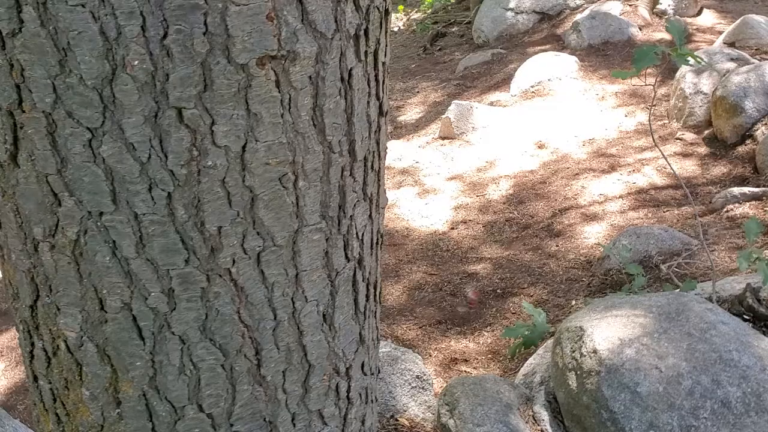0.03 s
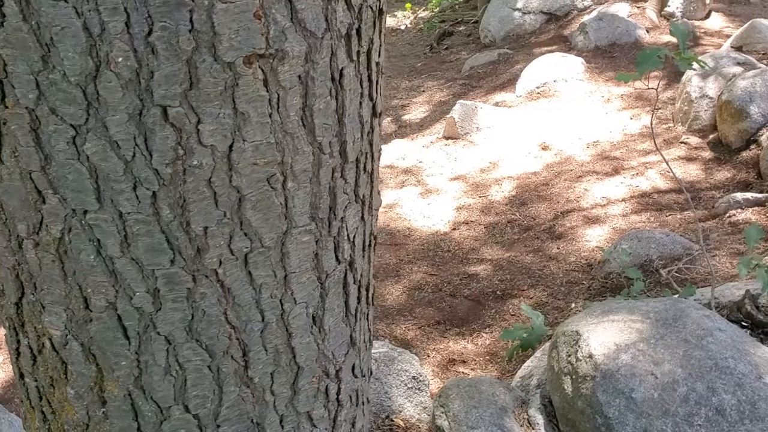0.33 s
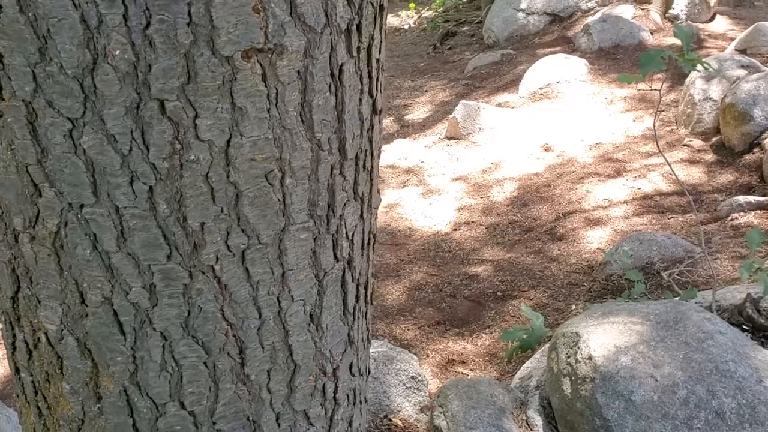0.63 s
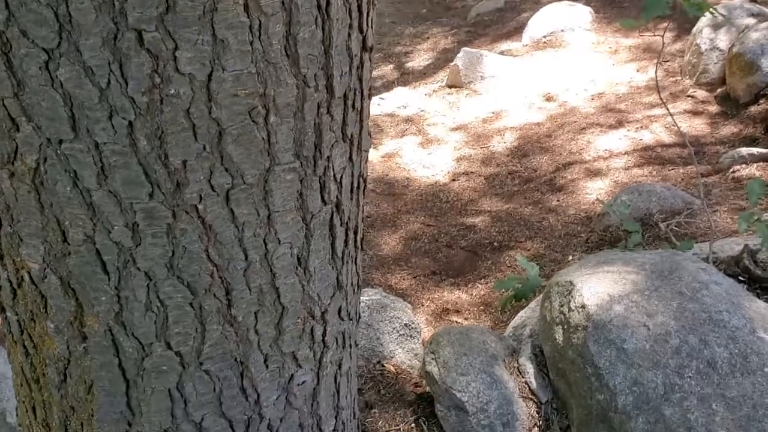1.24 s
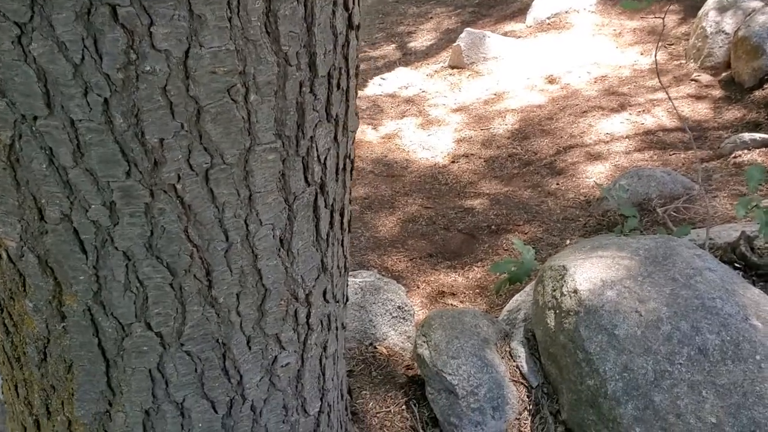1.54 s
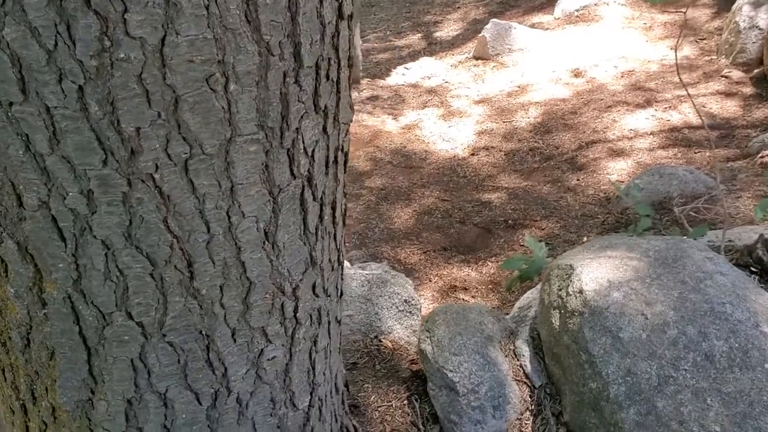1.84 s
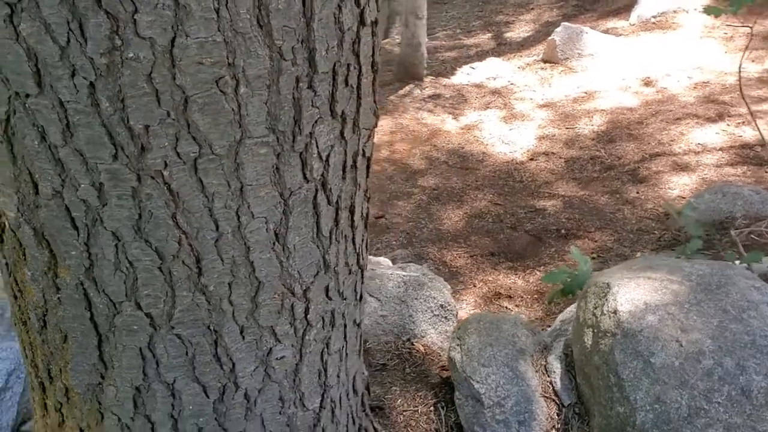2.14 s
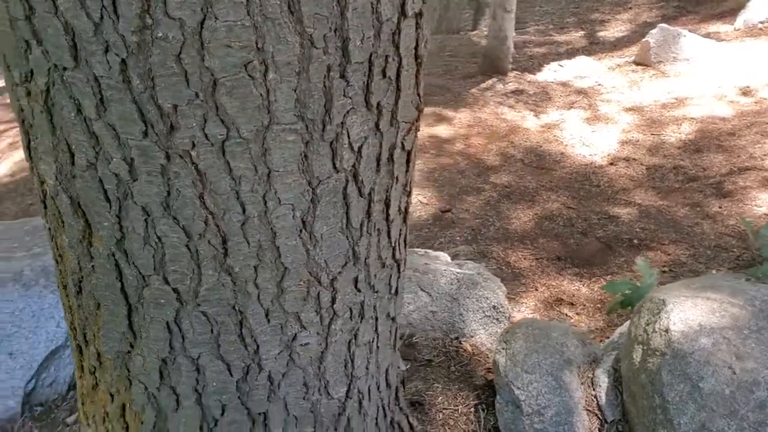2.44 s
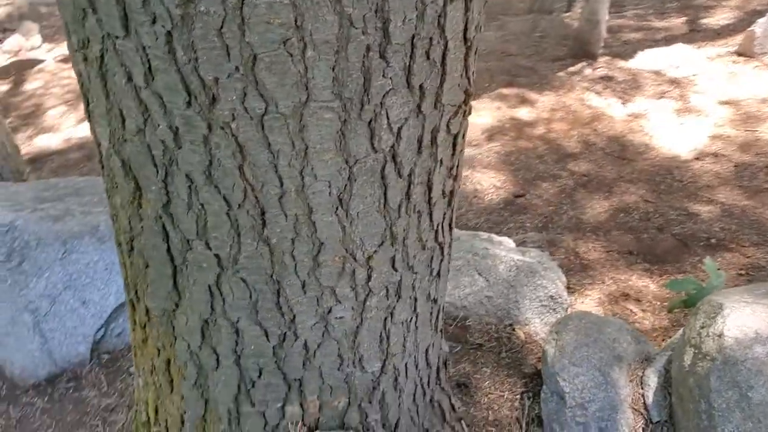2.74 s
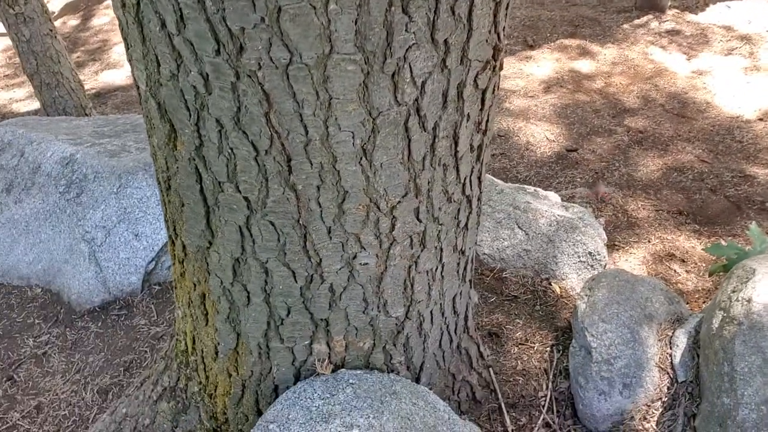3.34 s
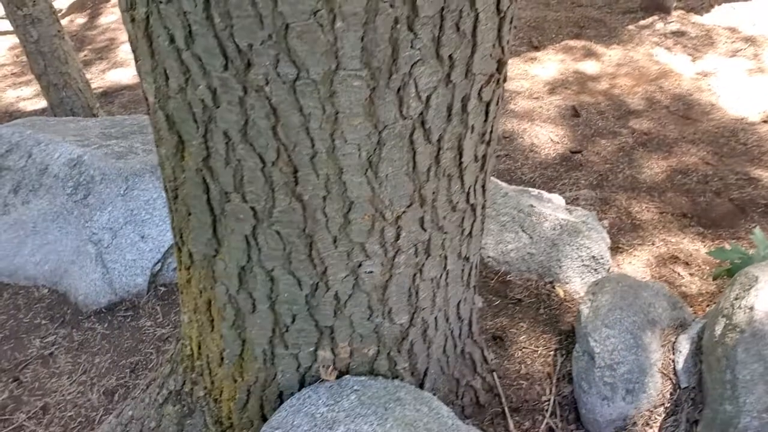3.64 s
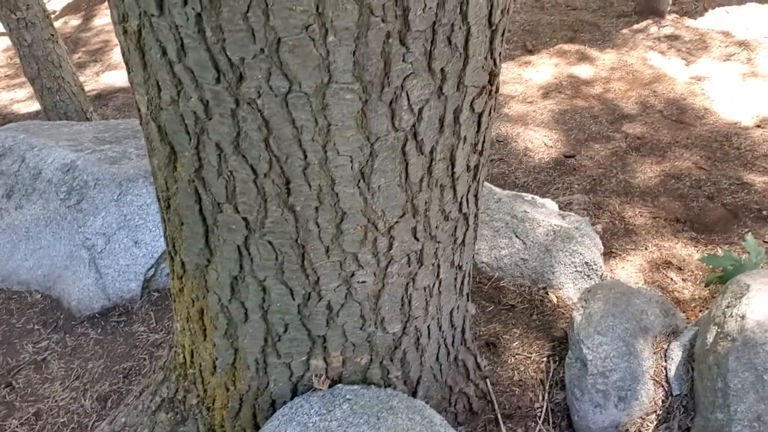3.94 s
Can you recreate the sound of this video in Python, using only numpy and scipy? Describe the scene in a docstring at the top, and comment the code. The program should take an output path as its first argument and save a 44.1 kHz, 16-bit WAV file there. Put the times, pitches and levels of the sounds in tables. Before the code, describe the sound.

Wind rushes through a pine wood and swells, with a few soft microphone bumps.

```python
"""Wind rushes through a pine wood, with a closer hiss of air on the right.
Fingers bump the case beside the right microphone at the start and again just before one second.
Then the wind swells and stays strong, while the hiss grows louder and brighter.
From about two seconds the hiss dulls again, and the fingers bump twice more."""
import sys
import numpy as np
from scipy import signal
from scipy.fft import rfft, irfft
from scipy.io import wavfile
from scipy.ndimage import uniform_filter1d

SR = 44100
rng = np.random.default_rng(int(sys.argv[2]) if len(sys.argv) > 2 else 0)


def store_pcm(level_fs):
    """Save levels as 16-bit WAV."""
    pcm = np.round(np.clip(level_fs, -1, 1) * 32767).astype(np.int16)
    wavfile.write(sys.argv[1], SR, np.atleast_2d(pcm).T)


N = 176400
T = np.arange(N) / SR
HZ = np.maximum(np.arange(N // 2 + 1) * SR / N, 1)


def gain(db):
    """Turn decibels into a number to multiply by."""
    return 10 ** (np.asarray(db) / 20)


def over_time(rows, t, column=1):
    """Join the values in one column of a time table with straight lines."""
    rows = np.array(rows)
    return np.interp(t, rows[:, 0], rows[:, column])


def over_pitch(rows):
    """Join the values in a pitch table, giving each octave equal room."""
    rows = np.array(rows)
    return np.interp(np.log(HZ), np.log(rows[:, 0]), rows[:, 1])


def noise_spectrum():
    """White noise, split into its pitches."""
    return rfft(rng.standard_normal(N))


def wobble(per_second):
    """A smooth random wander, about 1 in size."""
    hold = int(SR / per_second)
    steps = np.repeat(rng.standard_normal(N // hold + 1), hold)
    smooth = uniform_filter1d(uniform_filter1d(steps, hold), hold)[:N]
    return smooth / smooth.std()


# How the wind swells: time_s, level_change_db, extra_bass_db, extra_middle_db
WIND_SWELL = [(.1, -9.5, -1, -3.5), (1.1, -10, 0.5, 0.5), (1.55, -4, -1.5, -1), (2.1, -0.24, -0.5, -.5),
              (2.5, -0.76, -1, 1.5), (3.2, -0.2, 0, 1.5), (3.7, -0.5, 2, 2.5), (4, 0.1, 0.5, 1)]
# The tone of wind in the trees: pitch_hz, level_db
WIND_TONE = [(20, -37), (35, -12), (55, 0.5), (85, 3.5), (125, -2.5), (190, -1.5), (260, -6), (400, -8),
             (600, -10.5), (760, -10.5), (1100, -12.5), (1450, -18), (1750, -13), (2500, -21),
             (3500, -26.5), (5000, -36), (7000, -40.5), (10000, -42.5), (15500, -60)]
# How alike the wind is on the left and right: pitch_hz, likeness_0_to_1
WIND_LIKENESS = [(100, 0.97), (260, 0.97), (500, 0.75), (800, 0.73), (1200, 0.1), (1500, 0.98), (2200, 0),
                 (4000, 0)]

def wind_in_pines():
    """Air rushes through the trees: the low rumble wavers, the rest is smoother."""
    level_db, buffet_db, flutter_db = -33.5, 1.0, 0.04
    likeness = np.clip(over_pitch(WIND_LIKENESS), 0, 1)
    left, unrelated = noise_spectrum(), noise_spectrum()
    lag_s = 0.0003 * HZ ** 2 / (HZ ** 2 + 940 ** 2)  # high pitches reach the right side later
    delayed = left * np.exp(-2j * np.pi * HZ * lag_s)
    right = likeness * delayed + np.sqrt(1 - likeness ** 2) * unrelated
    both = np.array([left, right]) * gain(over_pitch(WIND_TONE))
    bass_share = 1 / (1 + (HZ / 200) ** 4)
    middle_share = np.exp(-.5 * (np.log2(HZ / 820) / 0.27) ** 2)  # a narrow band around 820 Hz
    rest_share = 1 - bass_share - middle_share
    bass, middle, rest = (irfft(both * share, N) for share in (bass_share, middle_share, rest_share))
    bass *= gain(buffet_db * wobble(per_second=18) + over_time(WIND_SWELL, T, column=2))
    middle *= gain(over_time(WIND_SWELL, T, column=3))
    air = bass + (rest + middle) * gain(flutter_db * wobble(per_second=9))
    return air / air.std() * gain(level_db + over_time(WIND_SWELL, T))


# How the hiss changes (a higher edge is brighter): time_s, level_db, edge_hz, extra_treble_db
HISS_FLOW = [(.1, -48, 2330, 3), (.36, -46.5, 2600, 0), (.47, -46.5, 3700, 2), (.7, -43.5, 4600, 0),
             (1.05, -43.5, 5730, -1.5), (1.5, -39.5, 6000, -2), (1.8, -36.5, 5840, -2),
             (2.05, -36, 4260, 1), (2.55, -36.3, 3630, 5), (3.15, -39.3, 3200, 4.5), (3.6, -42.5, 2620, 2),
             (4, -42.5, 2580, 0)]
# The tone of the hiss before the edge dulls it: pitch_hz, level_db
HISS_TONE = [(100, -41), (400, -6), (800, -3), (1200, -1), (1900, 0.5), (2900, -2), (4200, -2),
             (5500, -4.5), (7000, -10.5), (10500, -11), (15500, -14)]

def close_hiss():
    """Air streams past close by. Its hiss fades above an edge pitch that moves with the flow."""
    edge_damping, flutter_db, treble_above_hz = 0.97, 0.65, 7300
    air = irfft(noise_spectrum() * gain(over_pitch(HISS_TONE)), N)
    hz, t, slices = signal.stft(air / air.std(), SR, nperseg=512)  # short slices, each toned separately
    ratio = hz[:, None] / over_time(HISS_FLOW, t, column=2)
    edge = 1 / np.hypot(1 - ratio ** 2, edge_damping * ratio)
    treble = gain((hz[:, None] > treble_above_hz) * over_time(HISS_FLOW, t, column=3))
    air = signal.istft(slices * edge * treble, SR)[1][:N]
    return air * gain(over_time(HISS_FLOW, T) + flutter_db * wobble(per_second=14))


def pulse(x):
    """One smooth hump, highest where x is 0."""
    return 1 / np.cosh(np.clip(x, -40, 40))


# Finger touches (long ones thud, short ones tick): time_s, half_width_ms, push_db, spring_back_0_to_1
FINGER_TOUCHES = [(0.1518, 1.5, -4.5, 0.24), (0.1471, 0.29, -18.5, 0.4), (.1487, 0.28, -20, .5),
                  (0.1498, 0.16, -17, 0.2), (0.8913, 0.14, -3.5, 0.37), (.8935, 1.3, -19, 0),
                  (2.4368, 0.47, -1, 0), (2.4370, 0.056, -5, 0.4), (2.4380, 0.054, 0, 0.47),
                  (2.4388, 0.23, -17, 0.5), (3.479, 0.42, -14.5, 0.03), (3.498, 2.1, -18, 0.1)]

def finger_bumps():
    """A finger pushes the case, which springs back; the microphone gives a short, low boom."""
    boom_hz, boom_damping, bass_cut_hz, case_top_hz = 62, 0.67, 60, 5240
    spring_delay = 3.7  # in half widths
    push = np.zeros(N)
    for time_s, half_width_ms, push_db, spring_back in FINGER_TOUCHES:
        half_widths = (T - time_s) * 1000 / half_width_ms
        push += gain(push_db) * (pulse(half_widths) - spring_back * pulse(half_widths - spring_delay))
    case = 1 / np.hypot(1, (HZ / case_top_hz) ** 2)  # the case muffles high pitches
    ratio = 1j * HZ / boom_hz
    boom = ratio ** 2 / (ratio ** 2 + boom_damping * ratio + 1)
    bass_cut = 1j * HZ / (bass_cut_hz + 1j * HZ)
    return irfft(rfft(push) * case * boom * bass_cut, N)


def scene():
    """Wind all round; hiss and bumps on the right, with a trace of the bumps on the left."""
    left, right = wind_in_pines()
    bumps = finger_bumps()
    return np.array([left + gain(-38) * bumps, right + close_hiss() + bumps])


# The tone of the left microphone's opening: pitch_hz, boost_db
LEFT_OPENING = [(5000, -0.5), (6400, -0.5), (7350, -13.5), (7900, -0.5), (8500, 7.5), (10000, 3.5),
                (13000, 6), (15500, 2)]
# The tone of the right microphone's opening: pitch_hz, boost_db
RIGHT_OPENING = [(5000, 0), (6200, -0.5), (7200, -7), (8000, -19), (9200, -3), (10700, 8.5), (12500, 0.5),
                 (15500, -9)]

def record(dry):
    """Each microphone opening colours the treble; the sound cuts in and loses its highest pitches."""
    start_s, fade_s, top_hz = 0.1, 0.002, 15700
    openings = gain([over_pitch(LEFT_OPENING), over_pitch(RIGHT_OPENING)])
    fade_in = np.clip((T - start_s) / fade_s, 0, 1)
    heard = irfft(rfft(dry) * openings, N) * fade_in
    top_cut = signal.ellip(10, .1, 80, top_hz, fs=SR, output="sos")
    return signal.sosfilt(top_cut, heard)


dry = scene()
out = record(dry)
store_pcm(out)
```